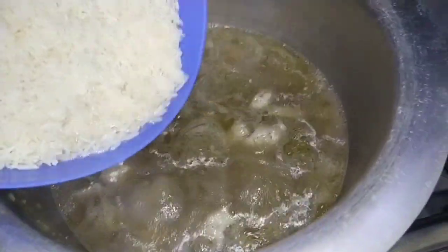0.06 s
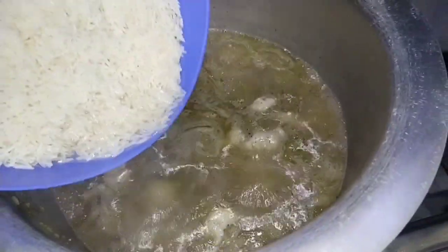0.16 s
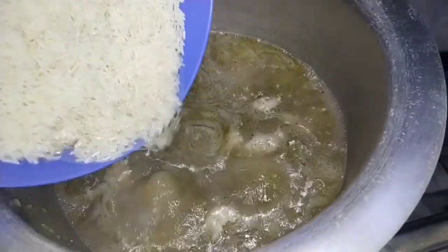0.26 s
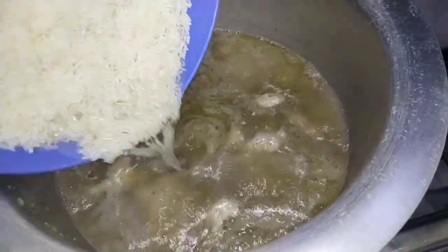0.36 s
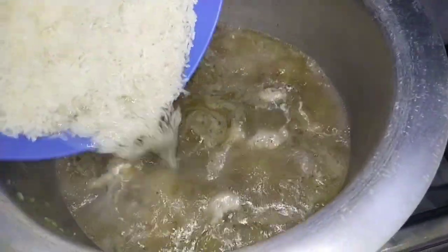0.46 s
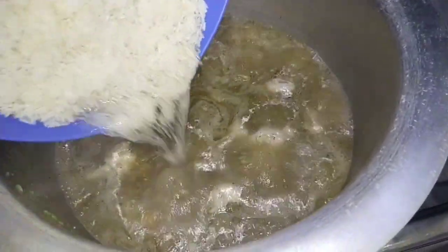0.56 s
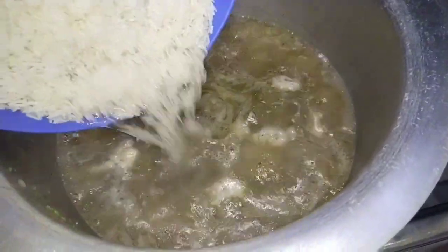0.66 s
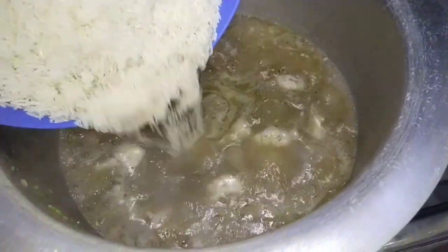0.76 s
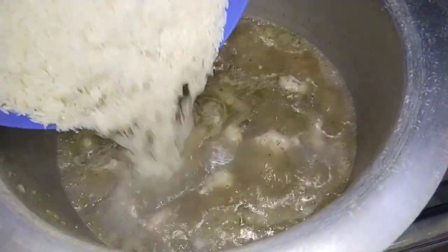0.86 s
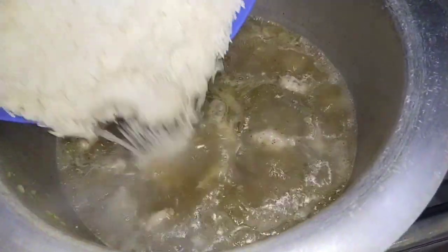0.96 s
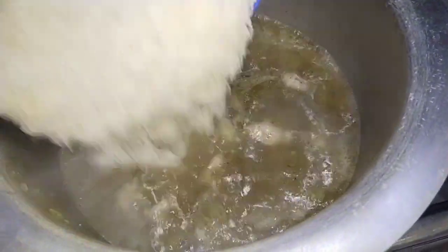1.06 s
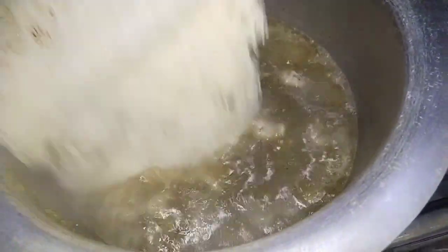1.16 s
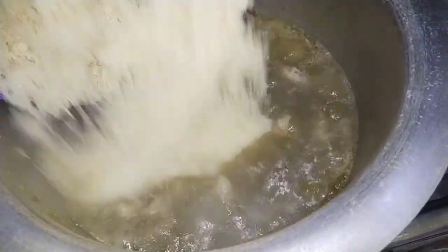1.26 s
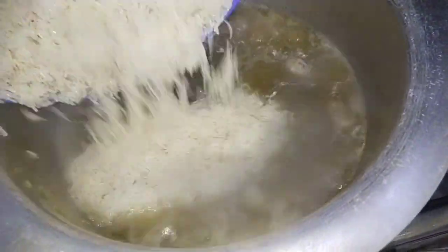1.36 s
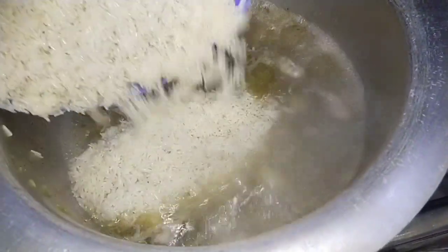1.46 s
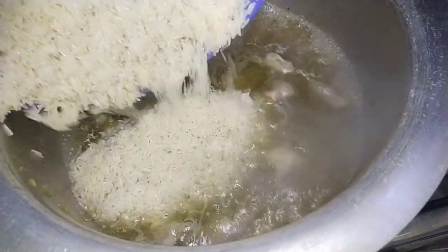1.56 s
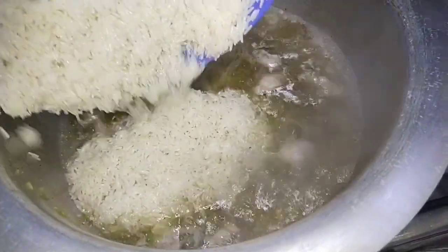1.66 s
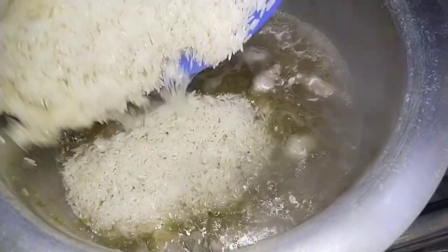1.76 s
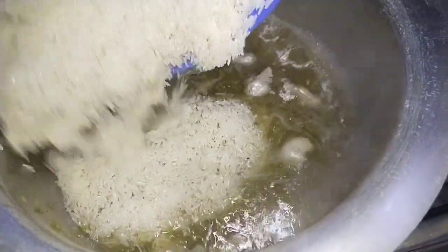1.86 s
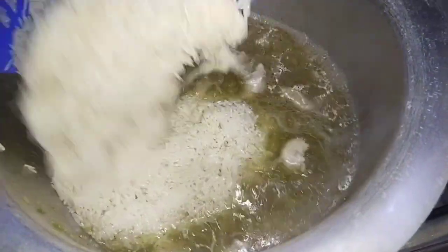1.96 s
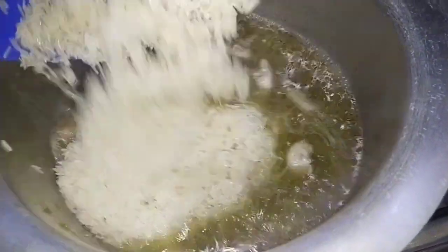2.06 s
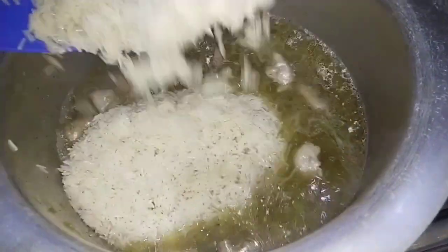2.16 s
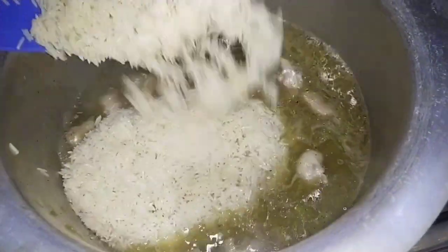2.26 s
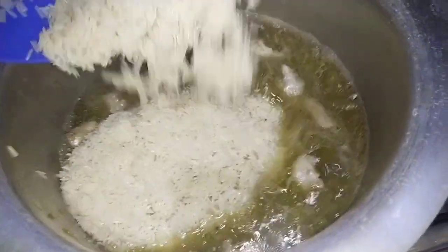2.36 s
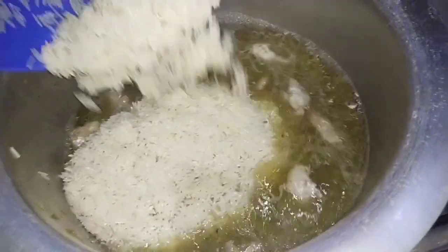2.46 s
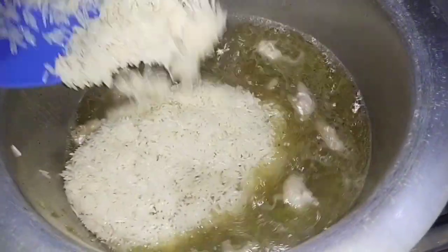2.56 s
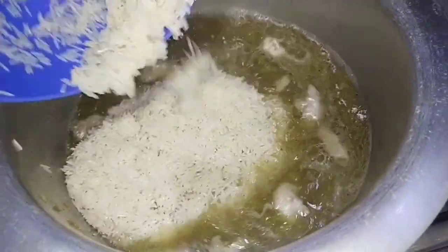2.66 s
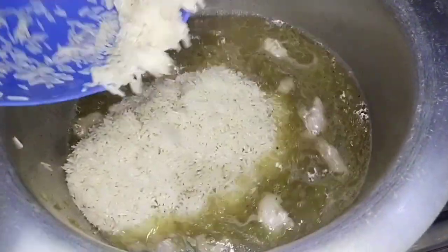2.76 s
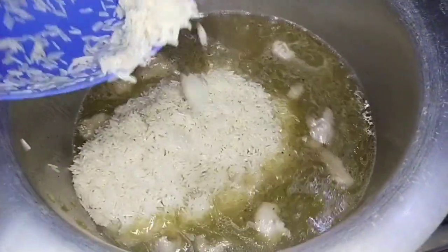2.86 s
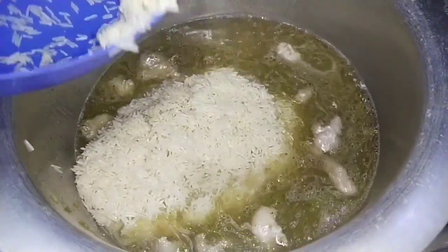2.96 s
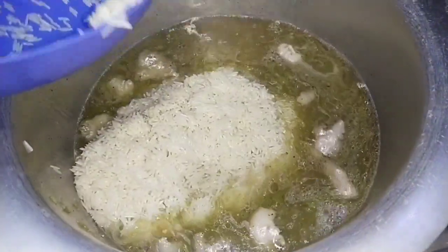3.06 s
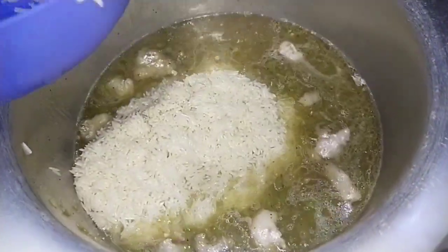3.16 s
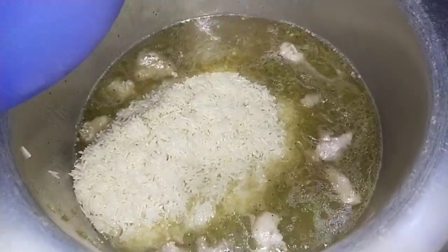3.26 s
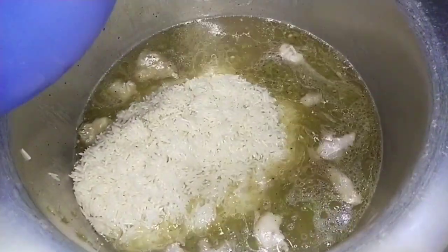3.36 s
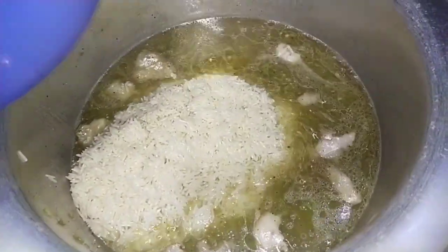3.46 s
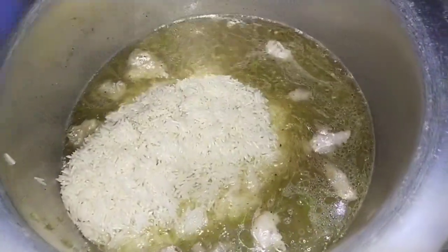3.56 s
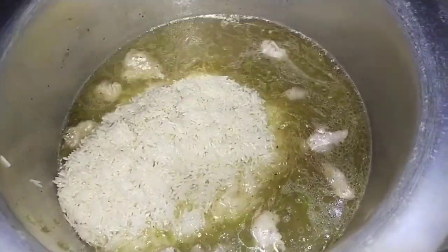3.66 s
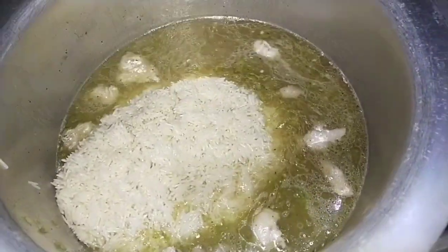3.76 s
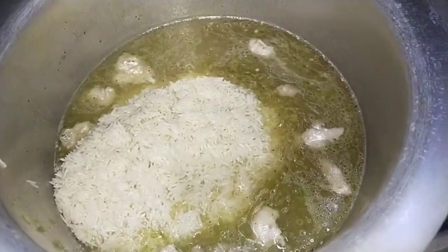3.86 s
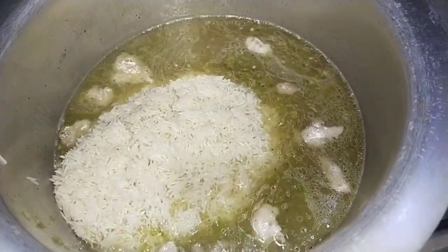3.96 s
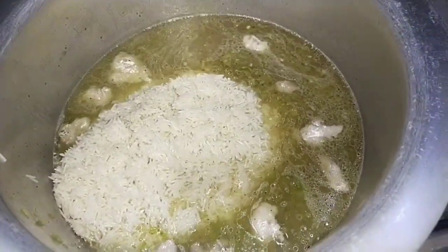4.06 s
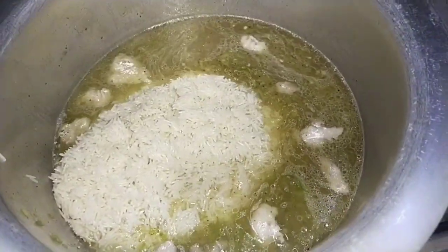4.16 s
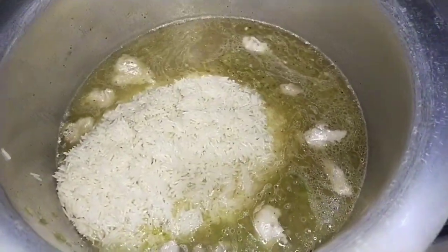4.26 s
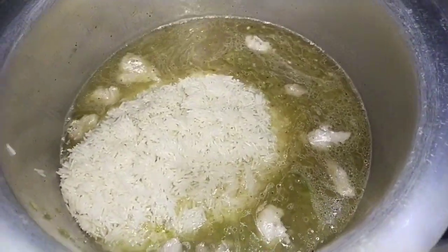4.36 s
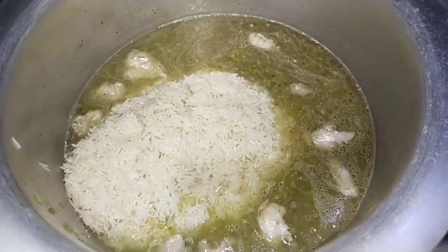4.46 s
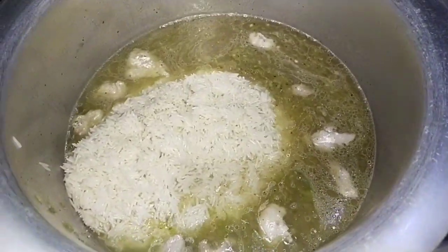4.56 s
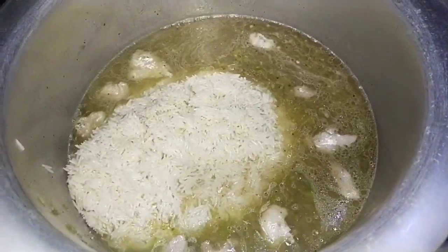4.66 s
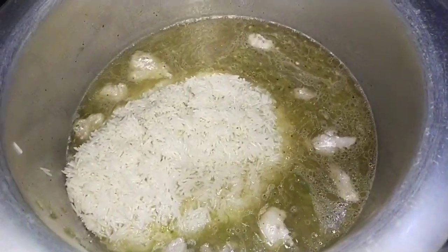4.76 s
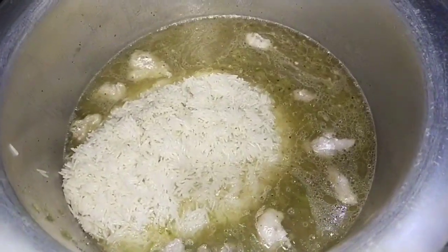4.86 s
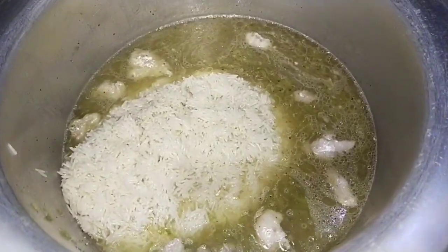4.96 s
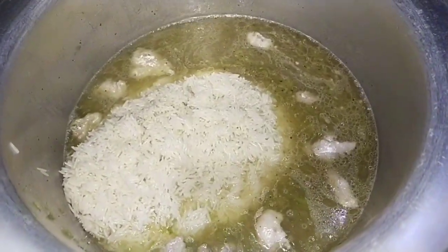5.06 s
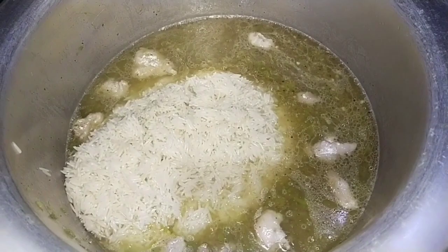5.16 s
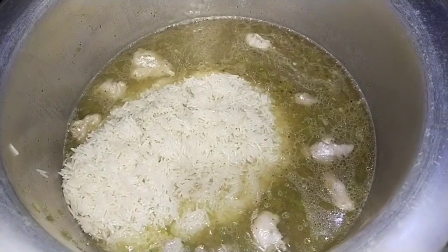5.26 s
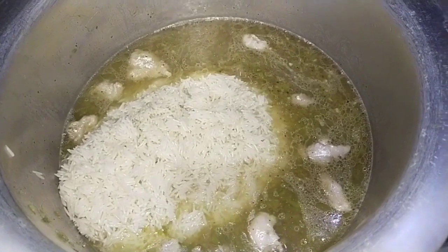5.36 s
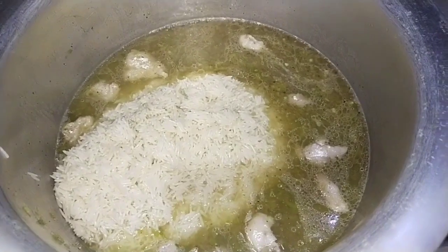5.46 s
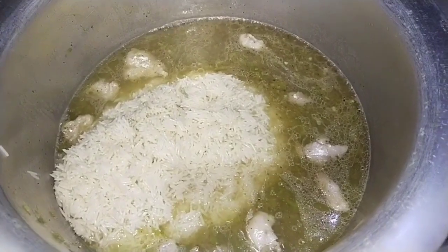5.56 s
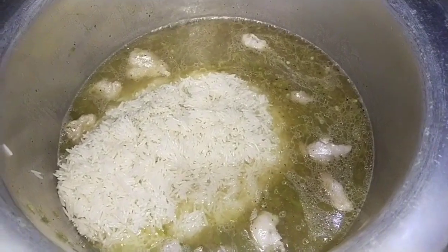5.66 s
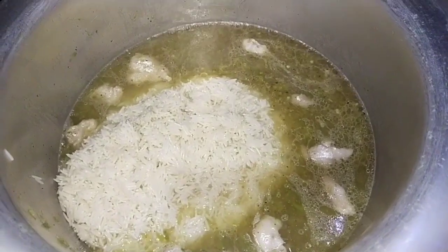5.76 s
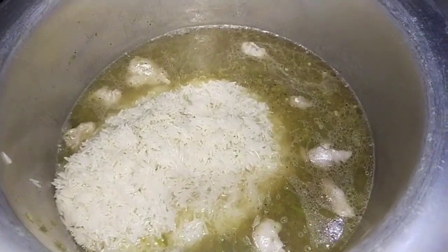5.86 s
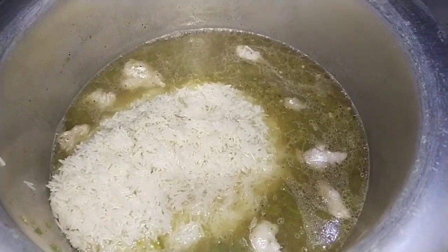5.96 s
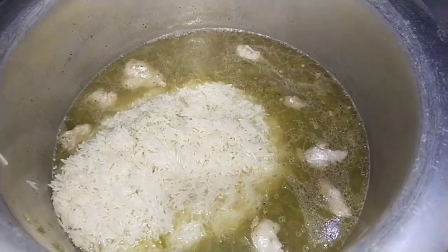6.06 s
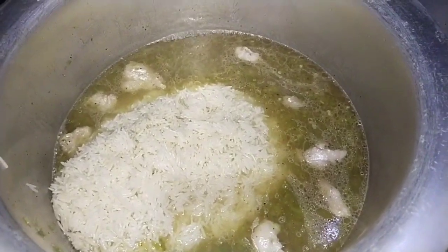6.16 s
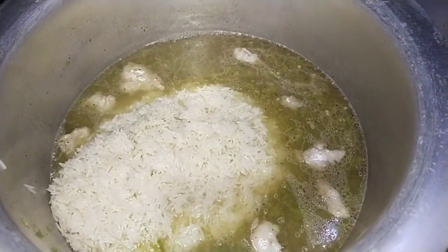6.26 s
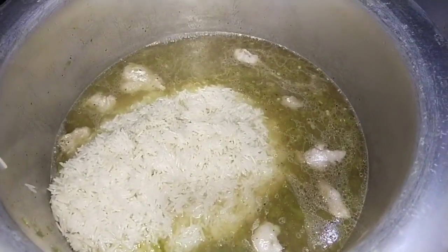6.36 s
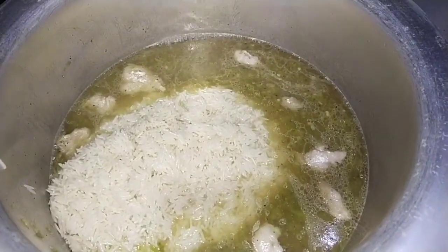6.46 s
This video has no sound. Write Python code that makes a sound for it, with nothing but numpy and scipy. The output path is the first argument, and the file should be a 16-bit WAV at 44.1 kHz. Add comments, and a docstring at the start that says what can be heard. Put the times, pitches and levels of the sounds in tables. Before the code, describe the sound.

Two soft bumps on a pot rim precede a bright trickle of rice into hot stock, quickly growing into wet slaps, gulping bubbles and snapping spits. Another rush tapers into dry ticking. The quiet simmer and low flutter of the flame continue, broken by a cluster of muffled hollow knocks and one stronger last knock. Close, left-heavy pickup in a reverberant kitchen, with only a faint leak on the right.

```python
"""Rice into boiling stock

Raw rice slides from a plastic bowl into a pot: a trickle of ticking grains and ringing air bubbles, slumping
clumps that splash and spit as noise bursts, then a thinning stream. The burner rumbles as uneven low noise
and the stock simmers and steams throughout. The bowl bumps the rim, and dull knocks on something hollow
ring in the hard-walled kitchen. The left microphone takes nearly all of it, the right a faint scattered leak.
"""
import sys
import numpy as np
from scipy import signal
from scipy.fft import rfft, irfft, next_fast_len
from scipy.io import wavfile
from scipy.ndimage import map_coordinates

SR = 44100
rng = np.random.default_rng(int(sys.argv[2]) if len(sys.argv) > 2 else 0)


def generate_wav(signal):
    """Clip the signal to [-1, 1] and save it as 16-bit WAV at the path in sys.argv[1]."""
    frames = np.transpose(np.atleast_2d(signal))
    scaled = np.clip(frames, -1, 1) * 32767
    pcm = np.round(scaled).astype(np.int16)
    wavfile.write(sys.argv[1], SR, pcm)


N = 287620

# air resonances of the pot above the stock: f/Hz, width/Hz, lift/dB
POT_RESONANCES = [(816, 25, 2.5), (984, 55, 8), (1185, 59, 6.5), (1400, 33, 8.5), (1595, 100, 4),
                  (1846, 55, 8.5), (2090, 25, 7), (2300, 53, 4.5), (2625, 88, 5), (2990, 54, 8)]
# colour of the burner's rumble, shared by the booms: f/Hz, level/dB
BURNER_COLOUR = [(20, -56), (50, -23), (72, -15.5), (88, -6), (100, 8), (114, -11), (150, -7.5), (180, -21),
                 (330, -16), (380, -17.5), (450, -66), (700, -74)]


def rice():
    """Grains tick on the heap and trap ringing air in the stock; slumps churn it, clumps splash and spray."""
    # the stream of rice leaving the bowl: t/s, level/dB
    flow_rows = [(0.56, -69), (0.76, -55), (1.12, -55), (1.18, -59), (1.25, -52), (1.65, -51.5),
                 (1.85, -58.5), (2.12, -59), (2.23, -52), (2.39, -59), (2.52, -54.5), (2.78, -67.5),
                 (2.95, -79.5)]
    # masses of rice slumping into the stock:
    # t/s, churn level/dB, grain hiss level/dB, build-up/s, fade/(dB/s), large bubbles over small/dB
    slumps = [(1.325, -48.5, -40, 0.017, 43, -1.5), (2.13, -51.5, -65, 0.13, 86, -0.5)]
    # air dragged under the surface: t/s, level/dB, fade/(dB/s)
    gulps = [(0.75, -59, 48), (0.925, -51.5, 80), (1.085, -60, 140), (1.263, -47, 45), (1.345, -62, 73),
             (1.57, -66, 86)]
    # clumps hitting the stock: t/s, spray level/dB, splash level/dB, bell half length/s
    clumps = [(0.726, -48.5, -49, 0.0029), (0.784, -52, -47, 0.012), (1.023, -38, -41.5, 0.0087),
              (1.087, -39, -46.5, 0.0084), (1.117, -42, -43.5, 0.012), (1.219, -39.5, -44.5, 0.0043),
              (1.263, -40, -37, 0.0045), (1.272, -30.5, -45, 0.0078), (1.32, -26.5, -29.5, 0.0063),
              (1.367, -40.5, -40.5, 0.032), (2.19, -44, -50.5, 0.0054), (2.259, -48, -61, 0.0097),
              (2.524, -55, -50.5, 0.017), (2.696, -61, -57.5, 0.012), (2.732, -75, -58, 0.013),
              (2.767, -77, -57.5, 0.025)]
    # colour of grains landing on grains: f/Hz, level/dB
    hiss_colour = [(2060, -10), (3500, 0), (5670, -6.5), (7600, -0.5), (9990, -7.5), (12400, -10),
                   (15100, -4), (16000, -4)]
    # colour of grains ticking on dry rice: f/Hz, level/dB
    sizzle_colour = [(6000, -27), (7400, 6), (8600, -21), (10500, -25)]
    # colour of the spray off the clumps: f/Hz, level/dB
    spray_colour = [(1760, -87), (3000, 4), (3220, -9.5), (5040, -4), (5920, -11), (6950, -0.5),
                    (11800, -10), (13500, -4.5), (16000, -12)]
    # colour of the dragged-under air: f/Hz, level/dB
    gulp_colour = [(71, -33), (120, -18), (145, -15.5), (225, 0), (359, 1), (425, -2), (750, 1.5),
                   (980, -30), (1650, -120)]
    pour_end = 3.1  # s
    small_db, large_db, hiss_db, sizzle_db = 1.5, -4, 3, -4.5  # over the flow
    heap_s, heap_db_per_s, sizzle_grows_s = 1.58, 38, 0.82
    gulp_rise_s = 0.018
    surge_db, surges_per_s = 1.6, 35

    # once the heap breaks the surface, large bubbles die out and ever more grains tick on dry rice
    flow = gain_curve(flow_rows)
    heap_age = np.maximum(np.arange(N) / SR - heap_s, 0)
    small = flow * amp(small_db)
    large = flow * amp(large_db - heap_db_per_s * heap_age)
    hiss = flow * amp(hiss_db)
    sizzle = flow * amp(sizzle_db) * np.minimum(heap_age / sizzle_grows_s, 1)

    slide = np.zeros(N)
    for s, churn_db, slide_db, rise, fade, large_over_small_db in slumps:
        wash = swell(s, rise, fade)
        small = np.hypot(small, amp(churn_db) * wash)
        large = np.hypot(large, amp(churn_db + large_over_small_db) * wash)
        slide = np.hypot(slide, amp(slide_db) * wash)
    gulp = sum(amp(db) * swell(s, gulp_rise_s, fade) for s, db, fade in gulps)
    clump_spray = sum(amp(db) * burst(s, half) for s, db, _, half in clumps)
    clump_splash = sum(amp(db) * burst(s, half) for s, _, db, half in clumps)

    plips = bubbles(rate=1500, low_hz=1610, high_hz=5300, cycles=61, spread_db=-2.5,
                    until=pour_end, size=900)
    plips = in_pot(patchy(plips, depth_db=2.0, width_hz=111.2, length=.06))
    blips = in_pot(bubbles(rate=570, low_hz=752, high_hz=1625, cycles=32, spread_db=-0.5,
                           until=pour_end, size=1500))
    air = bubbles(rate=870, low_hz=133.5, high_hz=736, cycles=15, spread_db=2.5,
                  until=pour_end, size=2400)
    slap = in_pot(bubbles(rate=2500, low_hz=900, high_hz=4500, cycles=30, spread_db=1,
                          until=pour_end, size=400))

    patter = clicks(rate=2200, spread_db=3.0, life_s=0.0028)
    patter = patchy(patter, depth_db=3.5, width_hz=120, length=0.025) * amp(1.3 * wobble(25.7))
    strays = coloured(clicks(rate=110, spread_db=2, life_s=.001), hiss_colour) * amp(-4)
    dry_ticks = coloured(clicks(rate=500, spread_db=3, life_s=.002), sizzle_colour)
    # too many grains at once to tell apart
    rush = patchy(rng.standard_normal(N), depth_db=3.5, width_hz=180, length=0.017)
    spray = clicks(rate=2500, spread_db=4.5, life_s=0.00024)
    spray = coloured(patchy(spray, depth_db=4.5, width_hz=466, length=0.012), spray_colour)

    surge = amp(surge_db * wobble(surges_per_s))  # the rice leaves the lip in small surges
    stream = surge * (small * plips + large * blips)
    stream += hiss * (coloured(patter, hiss_colour) + strays)
    stream += sizzle * dry_ticks + slide * coloured(rush, hiss_colour)
    return stream + clump_spray * spray + clump_splash * slap + gulp * coloured(air, gulp_colour)


def in_pot(x):
    """Splashing in the pot: resonances drift and wax as the bowl moves and the rice lands elsewhere."""
    # colour of the splashing: f/Hz, level/dB
    splash_colour = [(500, -33), (700, -13.5), (860, -4.5), (1050, -18), (1300, -4.5), (1800, 4.5),
                     (2700, 7.5), (4000, 5.5), (5500, -2.5), (7200, -49)]
    pitch_drift, lift_drift, drift_per_s = .008, .45, 9  # both drifts are relative
    hz, t, z = signal.stft(x, SR, nperseg=2048)
    lift = 0
    for centre, width, db in POT_RESONANCES:
        drifted = centre * (1 + pitch_drift * wobble(drift_per_s, t))
        peak_db = db * (1 + lift_drift * wobble(drift_per_s, t))
        lift = lift + peak_db / (1 + (2 * (hz[:, None] - drifted) / width) ** 2)
    return coloured(signal.istft(z * amp(lift), SR, nperseg=2048)[1][:N], splash_colour)


def spits():
    """Each spitting drop bursts with a sharp noise crack and a short, rough narrow-band ring."""
    # drops spitting: t/s, level/dB, f/Hz, ring level/dB
    drops = [(0.5773, -30.5, 3640, 10), (0.8934, -19, 6900, 12.5), (0.906, -19, 8160, 4),
             (1.002, -20.5, 7000, 8.5), (1.061, -21.5, 6850, 11.5), (1.087, -14.5, 6800, 3),
             (1.144, -8, 7900, -1.5), (1.2115, -25, 9000, 13), (1.264, -18, 7000, 2),
             (1.316, -11.5, 6900, 8), (2.253, -39, 7660, -1), (2.3145, -29, 7300, 5.5),
             (2.4517, -18.5, 7950, 2.5), (2.6443, -28, 3740, 4.5), (5.0795, -38, 3400, 14.5)]
    crack_colour = [(1500, -45), (5000, -19), (7500, 11), (11000, -4), (14500, 11), (17000, 7)]
    ring_cycles, crack_t60 = 180, 0.0039  # cycles and seconds to fall by 60 dB
    out, t = np.zeros(N), np.arange(SR // 12) / SR
    for s, db, pitch_hz, ring_db in drops:
        t60 = ring_cycles / pitch_hz
        ring = unit(filtered(rng.standard_normal(len(t)),
                             lambda hz: 1 / (1 + ((hz - pitch_hz) / (.15 * pitch_hz)) ** 2)))
        crack = coloured(rng.standard_normal(len(t)), crack_colour)
        pop = amp(ring_db - 10.0 - 60 * t / t60) * ring
        pop += amp(8.0 - ring_db - 60 * t / crack_t60) * crack
        add(out, s + .0005, amp(db - 10.0) * pop * (1 - np.exp(-t / 0.000098)))
    return out


def plops():
    """Single large bubbles ring as decaying sines that climb in pitch as they near the surface."""
    # large bubbles: t/s, f/Hz, level/dB, t60/s
    large_bubbles = [(0.907, 472, -28.5, 0.044), (1.2555, 1760, -28, 0.064), (1.310, 2040, -24, 0.033),
                     (2.525, 1630, -43, 0.069), (2.681, 1680, -49, 0.16), (3.087, 1630, -55, 0.062),
                     (5.06, 968, -54.5, 0.28)]
    rise_per_s = 0.47  # relative, applied to the phase
    out, t = np.zeros(N), np.arange(SR // 6) / SR
    for s, pitch_hz, db, t60 in large_bubbles:
        ring = np.sin(2 * np.pi * pitch_hz * t * (1 + rise_per_s * t))
        add(out, s, amp(db - 60 * t / t60) * (1 - np.exp(-t / 0.00077)) * ring)
    return out


def hollow_knocks():
    """Dull knocks excite the decaying modes of something hollow."""
    # knocks: t/s, level/dB, hardness/dB, contact level/dB, contact f/Hz
    blows = [(4.392, -19, -11.5, 1, 310), (4.46, -27, -16, -2, 300), (4.513, -22, -19.5, 8, 239),
             (4.594, -30, -20, 12, 320), (5.151, -14, -11.5, 3, 515)]
    # modes of the hollow body: f/Hz, level/dB, t60/s
    body = [(116, -15, 0.99), (234.9, 4.5, 0.35), (274.6, -0.5, 0.24), (310, -5.5, 0.47), (378, -1, 0.62),
            (440, -13.5, 0.68), (465.4, -3.5, 0.33), (503, -7, 0.34), (581, -10, 0.47), (692, -17.5, 0.32),
            (863, -21.5, 0.91), (1050, -20.5, 0.73), (1343, -17, 0.54), (1590, -17.5, 0.53),
            (2107, -11, 0.22), (2170, -21.5, 0.76), (2655, -12, 0.18)]
    return strikes(blows, body, thud_db=-27, contact_t60=0.095)


def rim_bumps():
    """The bowl bumps the rim of the pot and excites the rim's decaying modes."""
    # bumps: t/s, level/dB, hardness/dB, contact level/dB, contact f/Hz
    blows = [(0.0545, -30.5, -13.5, 8.5, 1040), (0.106, -28, -14, 9.5, 446), (0.213, -40.5, -15.5, 13, 900),
             (3.2, -42.5, -38, 10.5, 270), (3.35, -50, -30, 0, 300), (3.526, -59, -1, 28, 850)]
    # modes of the rim: f/Hz, level/dB, t60/s
    rim = [(196.2, 4, 0.3), (235.9, -0.5, 0.63), (279.3, 7, 0.22), (379.4, -1, 0.67), (755, -3, 0.37),
           (875, -12, 0.4), (1120, -11, 0.14), (1367, -7, 0.17), (1550, -0.5, 0.35)]
    return strikes(blows, rim, thud_db=-28, contact_t60=0.037)


def strikes(blows, modes, thud_db, contact_t60):
    """Each blow rings the modes and fills the room; harder is brighter, and each contact has its pitch."""
    # colour of the room's dull thud: f/Hz, level/dB
    thud_colour = [(30, -52), (70, -13), (110, -10), (190, -9), (250, 7.5), (400, 0.5), (570, -9),
                   (700, -12), (950, -12), (2000, -39)]
    # colour of the room's bright clack: f/Hz, level/dB
    clack_colour = [(300, -5), (700, 0), (1400, -3.5), (2200, -4.5), (3100, -9), (3700, -17.5),
                    (4800, -17.5), (5700, -27), (7500, -17), (11000, -34.5), (15500, -25)]
    contact_q = 1  # how clearly pitched a contact sounds
    out, t = np.zeros(N), np.arange(SR) / SR
    for s, db, hard_db, contact_db, contact_hz in blows:
        ring = np.zeros(SR)
        for hz, level, t60 in modes:
            brightness = (hard_db + 12.5) * np.clip(hz / 500 - 1, 0, 1)
            strength = level + rng.normal(0, 1) + brightness
            twin = hz * (1 + 0.0105 * rng.standard_normal())  # a close partner mode beats with each
            pair = np.sin(2 * np.pi * (hz * t + rng.random()))
            pair += 0.58 * np.sin(2 * np.pi * (twin * t + rng.random()))
            ring += amp(strength - 2.0 - 60 * t / t60) * pair
        thud = coloured(tail()[:SR], thud_colour)
        rattle = amp(3 * wobble(170, t))
        clack = coloured(tail()[:SR], clack_colour) * rattle
        # the direct sound of the contact arrives ahead of the room
        push = unit(filtered(
            rng.standard_normal(SR),
            lambda hz: 1 / (1 + (contact_q * (hz / contact_hz - contact_hz / (hz + 1))) ** 2)))
        contact = amp(contact_db - 17.0 - 60 * t / contact_t60) * push
        room = (amp(-13.0) * ring + amp(thud_db) * thud) * (1 - np.exp(-t / 0.018))
        room += amp(hard_db - 23.5) * clack
        add(out, s, amp(db) * (room + contact) * (1 - np.exp(-t / 0.00085)))
    return out


def booms():
    """Short low booms of burner-coloured noise around some bumps, knocks and the big slump of rice."""
    # booms: t/s, level/dB
    boom_rows = [(0.08, -46), (0.255, -47), (1.37, -52), (4.54, -44.5), (5.23, -45.5)]
    rise_s, fade_db_per_s = 0.02, 56.5
    level = sum(amp(db) * swell(s, rise_s, fade_db_per_s) for s, db in boom_rows)
    return level * coloured(rng.standard_normal(N), BURNER_COLOUR)


def rustle():
    """A soft scraping of dense tiny impacts as the emptied bowl is drawn away."""
    # scrapes: t/s, level/dB, bell half length/s
    scrapes = [(3.425, -56, 0.022), (3.463, -56, 0.025), (3.543, -53.5, 0.026), (4.194, -57, 0.022)]
    scrape_colour = [(500, 1.0), (950, 1), (1300, -7), (2100, 10.5), (3100, 2), (4000, -8), (9000, -21)]
    level = sum(amp(db) * burst(s, half) for s, db, half in scrapes)
    scrape = patchy(ticks(rate=2500, spread_db=3), depth_db=8.0, width_hz=100, length=.05)
    return level * coloured(scrape, scrape_colour)


def stove():
    """The flame rumbles as unsteady low noise under fine simmering bubbles and a hiss of steam."""
    # the boil, quietened by the cold rice and then returning: t/s, level/dB
    boil_rows = [(0.3, -57.5), (3.0, -65), (4.3, -65), (6.5, -59)]
    # the low rumble swells and sinks: t/s, level/dB
    rumble_rows = [(0.0, -52), (0.4, -68), (0.7, -61), (1.1, -74), (1.75, -73), (1.88, -65.5), (2.3, -62.5),
                   (2.53, -68), (2.7, -56), (2.92, -63.5), (3.13, -76), (3.37, -56), (3.98, -71.5),
                   (4.27, -59.5), (5.7, -69.5), (5.83, -62.5), (6.5, -69.5)]
    # colour of the simmering: f/Hz, level/dB
    simmer_colour = [(100, -78), (170, -4), (287, 0.5), (345, 1.5), (385, 11), (450, 1), (620, -6.5),
                     (750, -8), (1000, -12.5), (1160, -15.5), (2110, -5), (2780, -7), (3070, -18.5),
                     (3350, -17.5), (5500, -26), (7150, -61), (12100, -120)]
    # colour of the steam: f/Hz, level/dB
    steam_colour = [(2200, -5), (3100, -0.5), (4500, -6), (4900, -5), (5740, -13.5), (6770, -4.5),
                    (6920, -4), (7330, -2), (8070, -7), (11200, -10), (15100, -2.5), (16000, -7)]
    # puffs of steam: t/s, level/dB, fade/(dB/s)
    puff_rows = [(4.707, -54.5, 142), (5.697, -58.5, 249)]
    puff_colour = [(1200, -11), (2700, 1), (5600, -7.5), (7500, -3.0), (11000, -23), (15000, -9)]
    flutter_db, flutter_per_s = 3.5, 6.4  # the unsteadiness of the flame
    simmer_db, simmer_follows = -63.5, 0.17  # the bubbling follows the boil far less than the steam does
    puff_rise_s = 0.0048

    t = np.arange(N) / SR
    boil_db = np.interp(t, *np.transpose(boil_rows))
    rumble_db = np.interp(t, *np.transpose(rumble_rows))
    flame = amp(rumble_db + flutter_db * wobble(flutter_per_s))
    flame = flame * coloured(rng.standard_normal(N), BURNER_COLOUR)

    simmer = amp(simmer_db + simmer_follows * (boil_db - boil_db.mean()))
    blips = bubbles(rate=450, low_hz=784.0, high_hz=4512, cycles=89, spread_db=2.5,
                    until=N / SR, size=1500)
    fizz = patchy(rng.standard_normal(N), depth_db=5.5, width_hz=70, length=.05) * amp(1.6 * wobble(20))
    bubbling = filtered(amp(-5.0) * blips + fizz, lambda hz: amp(pot_lift(hz)))
    pot = simmer * coloured(bubbling, simmer_colour)

    steam = patchy(ticks(rate=14000, spread_db=5), depth_db=5.0, width_hz=100, length=.05)
    vapour = amp(boil_db) * coloured(steam, steam_colour) * amp(0.63 * wobble(31))
    puffs = sum(amp(db) * swell(s, puff_rise_s, fade) for s, db, fade in puff_rows)
    puffs = puffs * coloured(ticks(rate=5300, spread_db=3), puff_colour)
    return flame + pot + vapour + puffs


def pot_lift(hz):
    """The dB by which the air in the pot lifts each frequency."""
    return sum(db / (1 + (2 * (hz - centre) / width) ** 2) for centre, width, db in POT_RESONANCES)


def bubbles(rate, low_hz, high_hz, cycles, spread_db, until, size=700):
    """Small air pockets rise in pitch and fall 60 dB in some cycles; repeats after until seconds."""
    when, pitch, strength = rng.random((int(rate * until), 3)).T[:, :, None]
    turns = low_hz * (high_hz / low_hz) ** pitch * np.arange(size) / SR
    age = turns / cycles
    level_db = spread_db * np.minimum(-np.log(1 - strength), 3) - 60 * age
    rings = amp(level_db) * np.sin(2 * np.pi * turns * (1 + 0.02 * np.minimum(age, 2)))
    span = int(until * SR)
    places = (when * span).astype(int) + np.arange(size)
    sound = np.bincount(places.ravel(), rings.ravel(), span)[:span]
    return unit(np.resize(sound, N))


def ticks(rate, spread_db):
    """Tiny impacts at random moments, rate a second, of random sign and size."""
    hit = rng.random(N) < rate / SR
    size = amp(spread_db * np.clip(rng.standard_normal(N), -2, 2))
    return unit(hit * rng.choice([-1, 1], N) * size)


def clicks(rate, spread_db, life_s):
    """Grains land at random moments, each a rough noise burst that falls to 1/e in life_s."""
    energy = ticks(rate, spread_db) ** 2
    keep = np.exp(-2 / (SR * max(life_s, 1 / SR)))
    envelope = np.sqrt(signal.lfilter([1], [1, -keep], energy))
    return unit(envelope * rng.uniform(-1.07, 1, N))


def patchy(x, depth_db, width_hz, length):
    """The colour shifts at random, in patches of the given width and length in seconds."""
    z = signal.stft(x, nperseg=1024)[2]
    rows, cols = np.indices(z.shape)
    rows = rows * SR / 1024 / max(width_hz, 40)
    cols = cols * 512 / SR / max(length, .012)
    field = map_coordinates(rng.standard_normal(z.shape), [rows, cols], order=1, mode="mirror")
    lift = amp(depth_db * np.clip(unit(field), -2, 2))
    return unit(signal.istft(z * lift, nperseg=1024)[1][:N])


def swell(s, rise, fade_db_per_s):
    """A gain that builds up to 1 at time s and then fades evenly in dB."""
    t = np.arange(N) / SR - s
    return np.exp(-(np.minimum(t, 0) / rise) ** 2 / 2) * amp(-fade_db_per_s * np.maximum(t, 0))


def burst(s, half):
    """A bell-shaped gain around time s."""
    return np.exp(-((np.arange(N) / SR - s) / half) ** 2 / 2)


def gain_curve(rows):
    """One gain per sample from (s, dB) rows; falls to -120 dB just outside them."""
    s, db = np.transpose(rows)
    times = np.r_[s[0] - .05, s, s[-1] + .05]
    return amp(np.interp(np.arange(N) / SR, times, np.r_[-120, db, -120]))


def wobble(rate, at=None):
    """A smooth random curve, rate knots a second, at each sample or at the given times."""
    at = np.arange(N) / SR if at is None else at
    fine = np.arange(0, N * rate / SR + 2, 1 / 8)
    knots = rng.standard_normal(int(N * rate / SR) + 4)
    return np.interp(at * rate, fine, map_coordinates(knots, [fine]))


def amp(db):
    """Decibels to gain."""
    return 10 ** (np.asarray(db) / 20)


def unit(x):
    """Scale to rms 1."""
    return x / np.sqrt(np.mean(x ** 2) + 1e-20)


def along(points, hz):
    """Read (Hz, value) points on a log axis."""
    f, v = np.transpose(points)
    return np.interp(np.log(hz + 1), np.log(f + 1), v)


def filtered(x, response):
    """x times a response of frequency."""
    size = x.shape[-1]
    m = next_fast_len(size + 8192)
    return irfft(rfft(x, m) * response(np.fft.rfftfreq(m, 1 / SR)), m)[..., :size]


def coloured(x, spectrum):
    """x through a (Hz, dB) spectrum, at rms 1."""
    return unit(filtered(x, lambda hz: amp(along(spectrum, hz))))


def add(track, s, sound):
    """Mix a sound into the track at time s."""
    start = max(round(s * SR), 0)
    track[start:start + len(sound)] += sound[:N - start]


def tail():
    """Noise that dies as the kitchen does, each frequency at its own pace."""
    # decay of the hard-walled kitchen: f/Hz, t60/s
    kitchen = [(100, 0.8), (300, 0.48), (2000, 0.51), (5000, 0.42), (15000, 0.3)]
    hz, t, z = signal.stft(rng.standard_normal(SR), SR, nperseg=256)
    return signal.istft(z * amp(-60 * t / along(kitchen, hz)[:, None]), SR, nperseg=256)[1]


def diffuse(x):
    """x scattered by the kitchen walls: convolved with a noise tail of unit energy."""
    echo = tail()
    return signal.fftconvolve(x, echo / np.linalg.norm(echo))[:N]


def scattered(x):
    """The same sound with its phases mixed up by many paths."""
    z = signal.stft(x, nperseg=512)[2]
    return signal.istft(z * np.exp(2j * np.pi * rng.random(z.shape)), nperseg=512)[1][:N]


def scene():
    """The left microphone is open to the pot; the right gets only a faint, scattered share and a noise floor."""
    leak_colour = [(60, -25.0), (300, -30), (1500, -29.5), (5000, -18.0), (15000, -33.5)]
    floor_colour = [(30, -1), (110, 20.5), (300, 10.5), (1000, 4.0), (15000, -3.5)]
    pour = rice() + spits() + plops()
    near = pour + amp(-9.5) * diffuse(pour)
    near += hollow_knocks() + rim_bumps() + booms() + rustle() + stove()
    leak = filtered(scattered(diffuse(near)), lambda hz: amp(along(leak_colour, hz)))
    floor = amp(-75.5) * coloured(rng.standard_normal(N), floor_colour)
    return np.array([amp(4.5) * near, leak + floor])


def record(dry):
    """The microphones pass no deep bass and nothing above the band limit."""
    low_hz, top_hz = 42, 15950
    return filtered(dry, lambda hz: (hz < top_hz) * hz ** 4 / (hz ** 4 + low_hz ** 4))


dry = scene()
out = record(dry)
generate_wav(out)
```